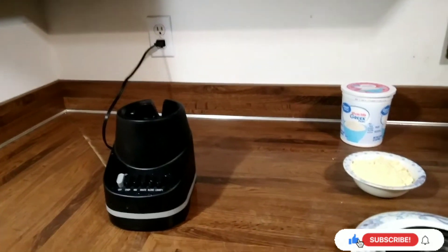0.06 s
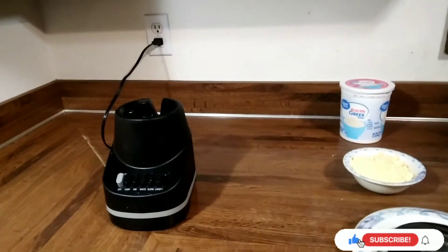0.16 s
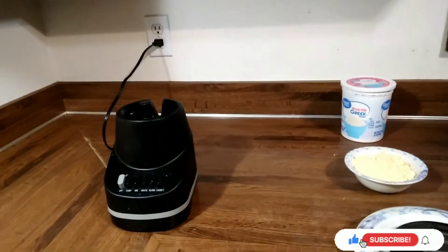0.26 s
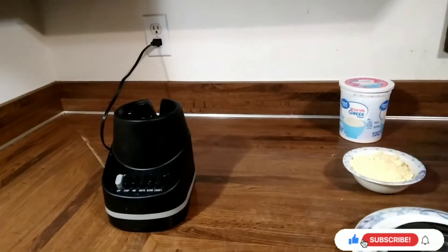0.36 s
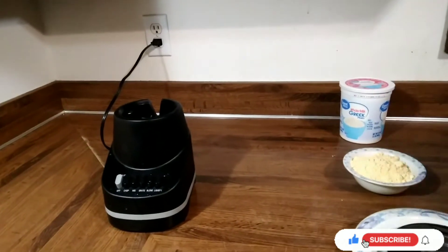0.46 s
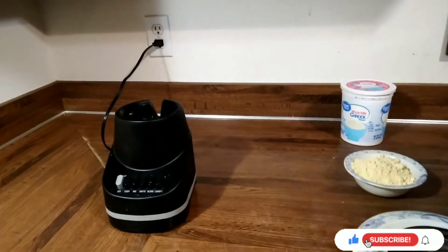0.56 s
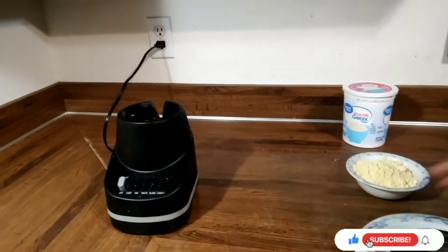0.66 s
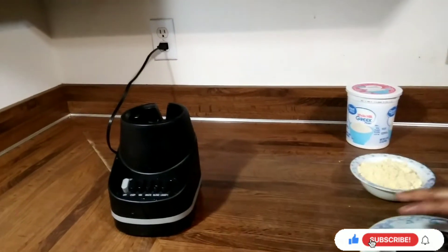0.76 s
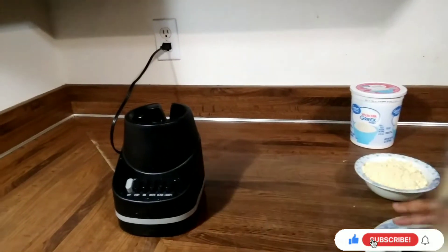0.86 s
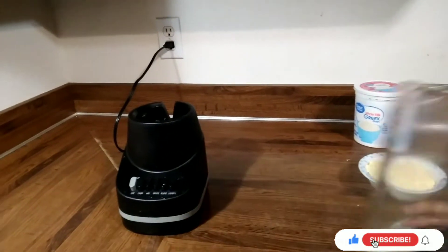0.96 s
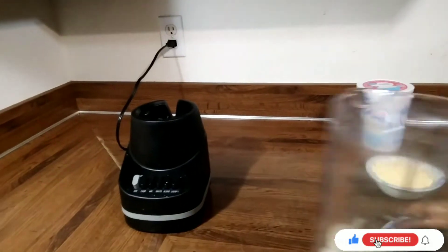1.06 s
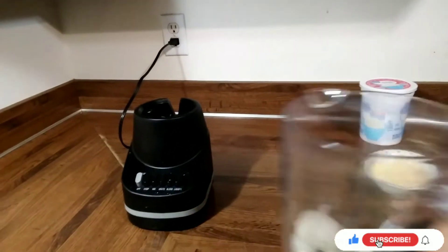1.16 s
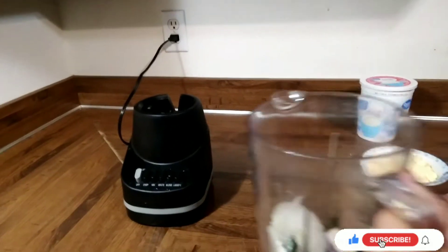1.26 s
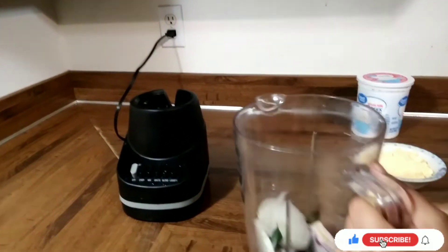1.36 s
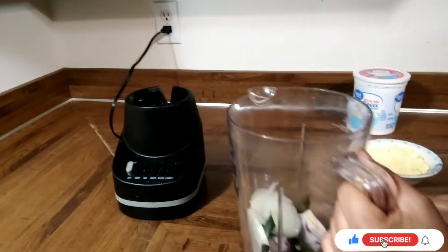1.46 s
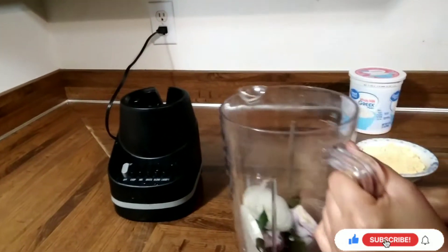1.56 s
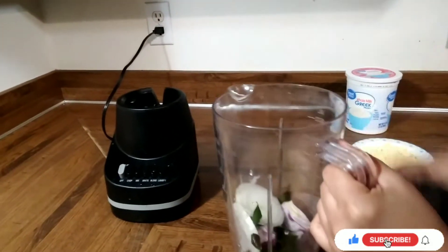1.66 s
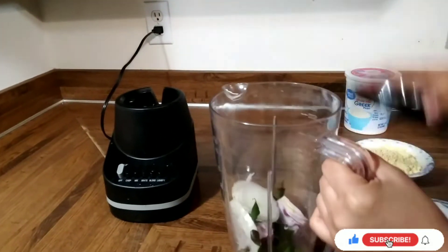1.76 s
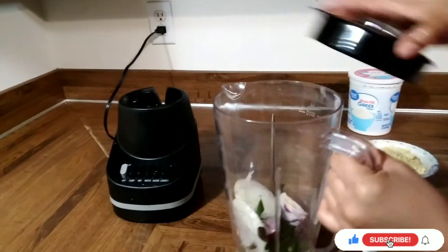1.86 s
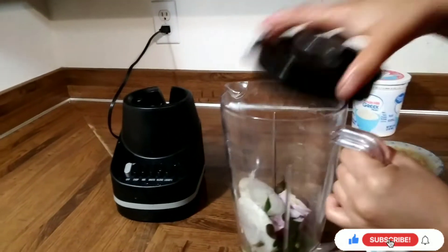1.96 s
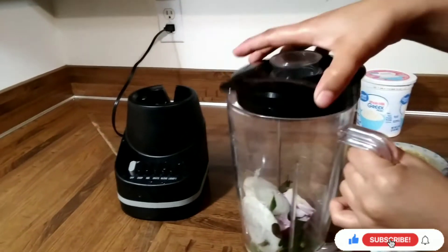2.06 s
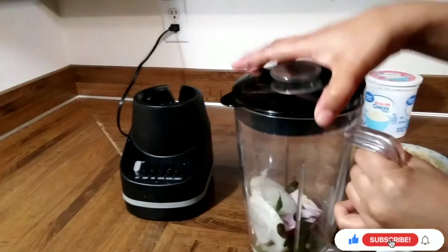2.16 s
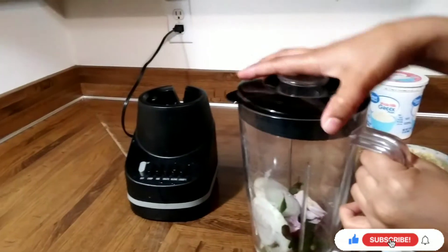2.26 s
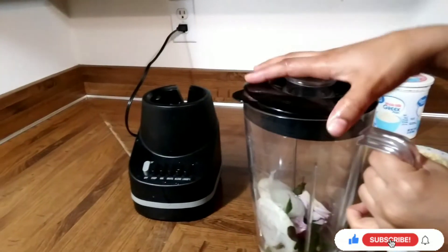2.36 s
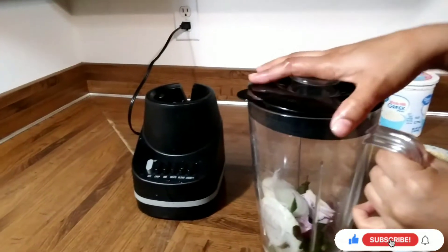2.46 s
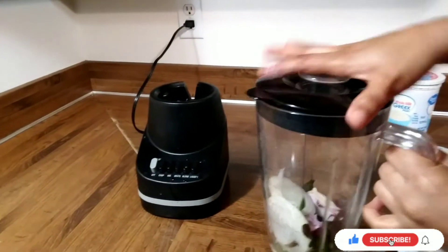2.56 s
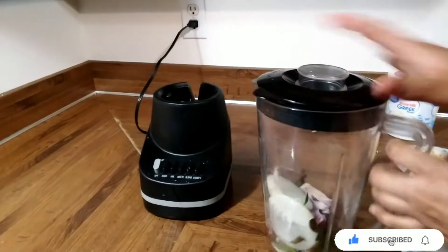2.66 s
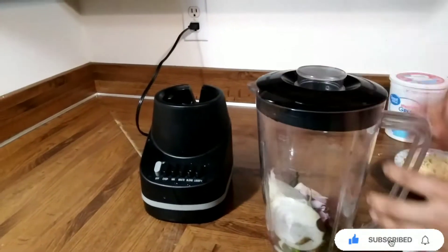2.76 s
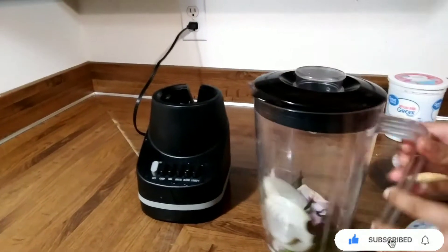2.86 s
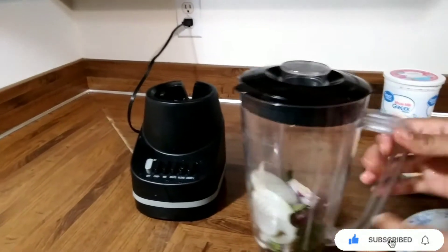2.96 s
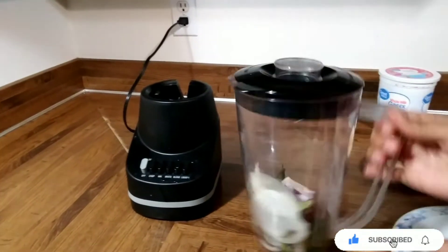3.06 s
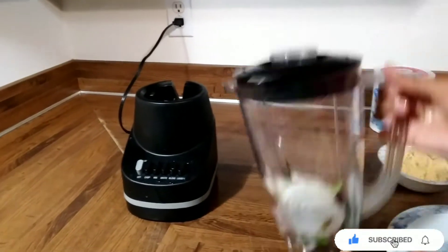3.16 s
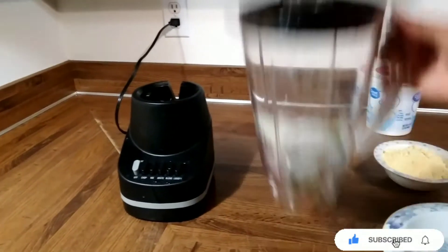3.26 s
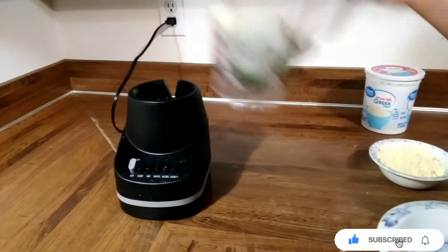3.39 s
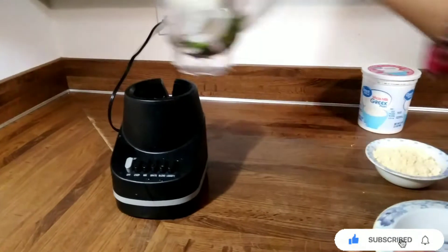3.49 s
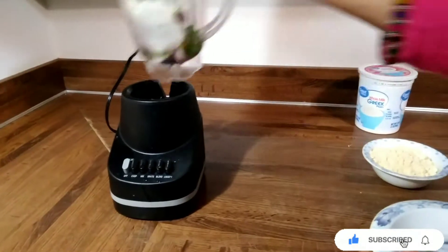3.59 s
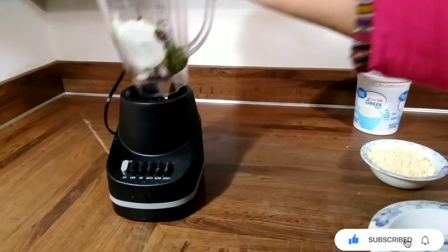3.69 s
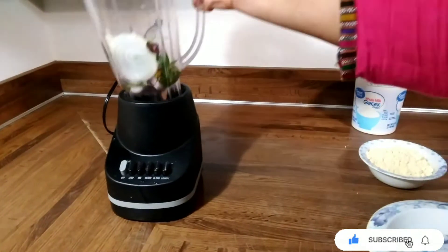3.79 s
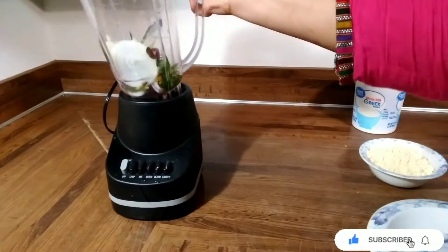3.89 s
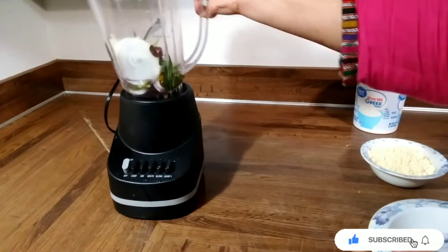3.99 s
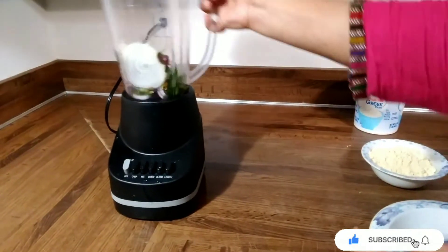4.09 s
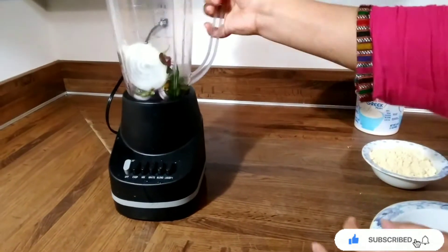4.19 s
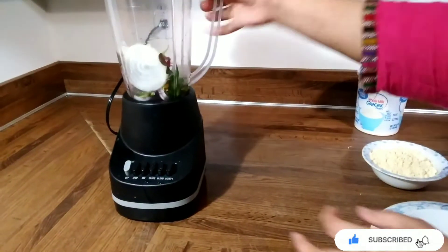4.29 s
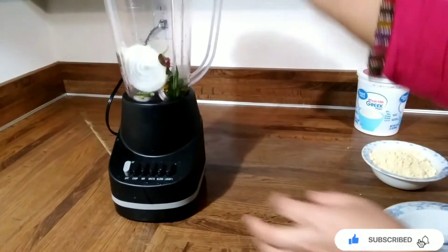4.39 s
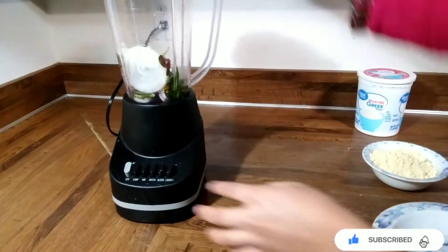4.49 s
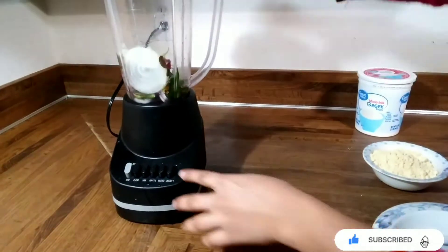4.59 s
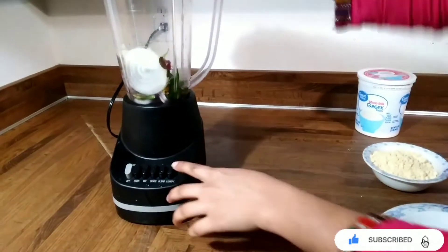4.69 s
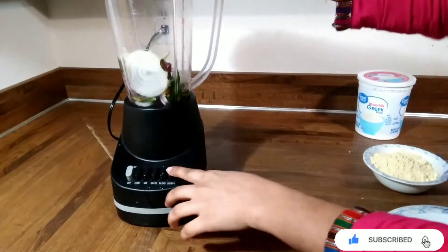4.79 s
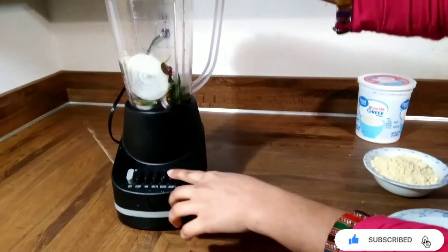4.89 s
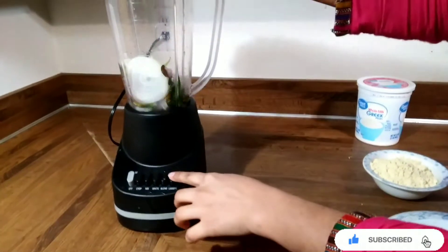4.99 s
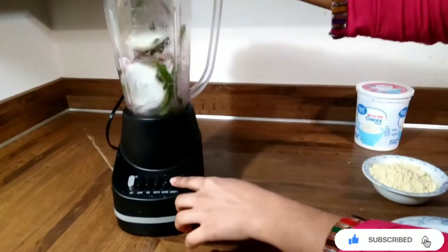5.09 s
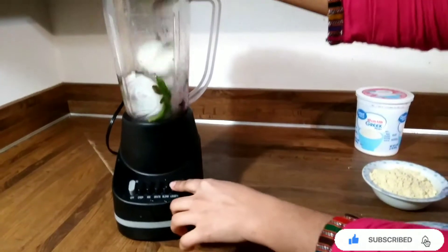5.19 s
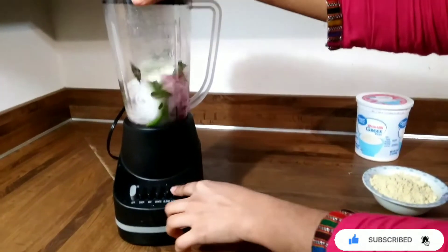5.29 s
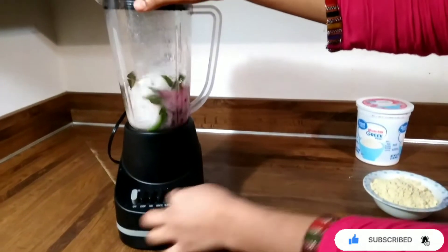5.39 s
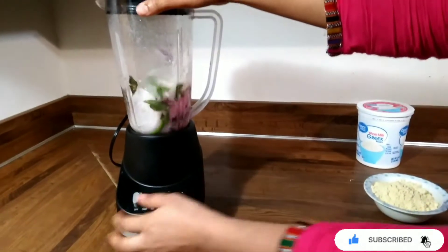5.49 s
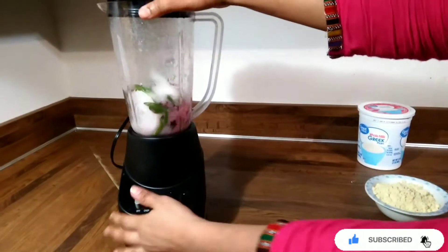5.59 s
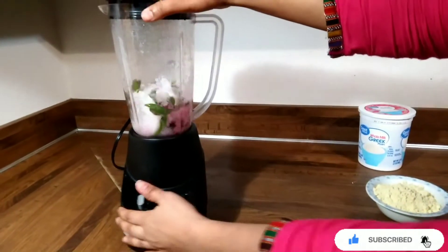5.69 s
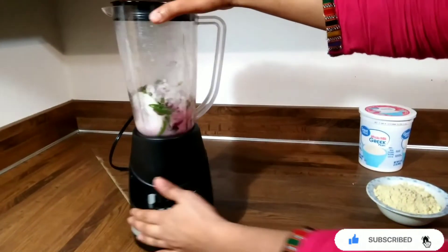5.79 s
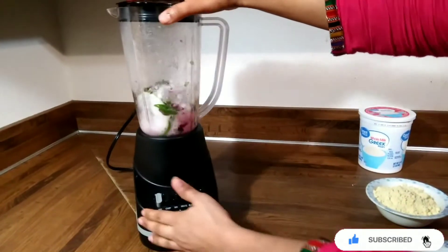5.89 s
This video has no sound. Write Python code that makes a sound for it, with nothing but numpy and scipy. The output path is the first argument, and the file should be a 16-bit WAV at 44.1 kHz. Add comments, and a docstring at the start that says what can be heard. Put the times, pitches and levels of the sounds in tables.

```python
"""A blender motor spins up, hums and whines while its blades chop vegetables and fling them at the jar wall.
Before a button starts it, the plastic jar is set on a wooden counter, lidded, lifted and seated on its
base: each blow rings the plastic, thumps the counter and cracks at the contact. Hands rub; trapped air pops.
A small kitchen, heard by two microphones, the left dull and the right bright."""
import sys
import numpy as np
from scipy import signal
from scipy.fft import rfft, irfft, next_fast_len
from scipy.io import wavfile
from scipy.ndimage import uniform_filter1d

SR = 44100
rng = np.random.default_rng(int(sys.argv[2]) if len(sys.argv) > 2 else 0)


def to_wav(s):
    """Save 16-bit WAV."""
    ch = np.atleast_2d(s).T  # columns
    pcm = np.round(np.clip(ch, -1, 1) * 32767)  # PCM
    wavfile.write(sys.argv[1], SR, pcm.astype(np.int16))


N = 261947
T = np.arange(N) / SR
KITCHEN_T60_S = .28


def from_db(db):
    return 10 ** (np.asarray(db) / 20)


def unit_rms(x):
    """Scale the channel mean to rms 1."""
    return x / np.sqrt(np.mean(np.atleast_2d(x).mean(0) ** 2) + 1e-20)


def at_hz(points, hz):
    """Interpolate on a log-frequency axis."""
    f, value = np.transpose(points)
    return np.interp(np.log(hz + 1), np.log(f), value)


def filtered(x, gain):
    """Apply gain(hz) by FFT."""
    size = next_fast_len(N + 8192)
    return irfft(rfft(x, size) * gain(np.arange(size // 2 + 1) * SR / size), size)[..., :N]


def white_pair():
    return rng.standard_normal((2, N))


def drift(rate_hz):
    """Slow random curve, rms 1."""
    knots = rng.standard_normal(2048)
    return unit_rms(np.interp(2 * rate_hz * T, np.arange(len(knots)), knots))


def bump(at_s, half_s):
    """Gaussian swell, height 1."""
    return np.exp(-np.minimum(((T - at_s) / half_s) ** 2, 20))


def clicks_at(times_s, sizes):
    out = np.zeros(N)
    out[np.round(np.asarray(times_s) * SR).astype(int)] = sizes
    return out


def ring(clicks, hz, t60_s):
    """Each click starts a damped sine."""
    r, w = from_db(-60 / (t60_s * SR)), 2 * np.pi * hz / SR
    return signal.lfilter([0, np.sin(w)], [1, -2 * r * np.cos(w), r * r], clicks + 1e-18)


def fade(energy, t60_s):
    """Each energy impulse decays exponentially."""
    return signal.lfilter([1], [1, -from_db(-120 / (t60_s * SR))], energy + 1e-18)


def stroke_power(table, release_db_per_s):
    """Summed power of strokes that swell, hold and decay."""
    power = 0
    for at_s, hold_s, db, rise_s in table:
        below_db = 20 * np.maximum(at_s - T, 0) / rise_s
        below_db += release_db_per_s * np.maximum(T - at_s - hold_s, 0)
        power = power + from_db(db - np.minimum(below_db, 100)) ** 2
    return power


# left-right likeness: f/Hz, correlation before clipping
STEREO_LIKENESS = [(60, 0.8), (300, 1.02), (570, 0.26), (900, 0.32), (1300, 0), (12000, 0)]


def coloured(pair, spectrum):
    """Shape two independent noises into a stereo field, alike in the bass; rms 1."""
    def gain(hz):
        alike = np.clip(at_hz(STEREO_LIKENESS, hz), -.99, .99)
        skirts = 1 / (1 + (hz / spectrum[-1][0]) ** 6) / (1 + (spectrum[0][0] / (hz + 1)) ** 4)
        return skirts * from_db(at_hz(spectrum, hz)) * np.sqrt([1 + alike, 1 - alike])
    mid, side = filtered(pair, gain)
    return unit_rms(np.array([mid + side, mid - side]))


# room rumble: f/Hz, level/dB
RUMBLE_SPECTRUM = [(20, 4), (45, -4.5), (70, -9), (110, -18.5), (160, -21.5), (320, -24.5), (600, -36),
                   (1200, -45), (2500, -58.5)]
# its swells: t/s, hold/s, level/dB, 20 dB rise/s
RUMBLE_SWELLS = [(0.5, .06, -49, .12), (1.1, .08, -48.5, .15)]


def rumble(room_db=-58, shudder_db=-17):
    """Low room noise with soft swells; the counter shudders on after each knock."""
    times_s, _, _, thump_db, _ = np.transpose(JAR_BLOWS + BASE_BLOWS)
    shudder = fade(clicks_at(times_s, from_db(thump_db + shudder_db) ** 2), t60_s=.8)
    power = from_db(room_db) ** 2 + stroke_power(RUMBLE_SWELLS, release_db_per_s=60) + shudder
    return uniform_filter1d(np.sqrt(power), size=SR // 100) * coloured(white_pair(), RUMBLE_SPECTRUM)


# friction noise: f/Hz, level/dB
RUB_SPECTRUM = [(290, -43), (500, -8.5), (534, -13.5), (766, -13), (1240, -22), (1610, -13.5),
                (1800, -17.5), (2220, -2), (2470, -2), (2680, -4.5), (3990, -7), (4390, -7.5), (6280, -21),
                (10300, -16), (12100, -26), (15700, -59.5), (22000, -120)]
# hand and jar strokes: t/s, hold/s, level/dB, 20 dB rise/s
RUB_STROKES = [(0.0, .035, -58, .05), (1.02, .05, -44, .15), (1.13, .08, -61, .05), (1.36, .2, -50.5, .015),
               (1.58, .015, -43, .04), (1.64, .28, -49, .05), (1.85, .025, -46, .1), (2.14, .12, -57.5, .1),
               (2.44, .06, -65, .01), (2.58, .075, -47, .15), (2.69, .04, -52, .05), (2.8, .03, -51, .06),
               (2.92, .035, -44, .09), (3.03, .03, -40.5, .04), (3.12, .025, -62, .05),
               (3.648, .008, -56, .008), (3.67, .03, -64.5, .05), (3.78, .055, -48, .02),
               (3.88, .06, -62, .05), (4.05, .125, -65, .04), (4.48, .055, -64, .25),
               (4.65, .135, -62, .05)]


def rubbing(hiss_db=-77):
    """Hand and jar slide: a grainy rustle with flickering resonances swells out of faint hiss."""
    grain = coloured(white_pair() * from_db(drift(150)), RUB_SPECTRUM)
    rustle = grain
    for hz in (2620, 2970, 3146, 3643):
        resonance = signal.lfilter(*signal.iirpeak(hz, Q=22, fs=SR), grain)
        rustle = rustle + from_db(-8 + 6.7 * drift(11)) * resonance
    power = stroke_power(RUB_STROKES, release_db_per_s=300) + from_db(hiss_db) ** 2
    return np.sqrt(power) * from_db(1.8 * drift(28)) * unit_rms(rustle)


def burst(times_s, level_db, spectrum, t60_s, tail_db, rise_t60_s):
    """Dense short-lived modes as noise: a crack, then the kitchen's tail."""
    energy = clicks_at(times_s, from_db(level_db) ** 2)
    power = fade(energy, t60_s) + from_db(tail_db) ** 2 * fade(energy, KITCHEN_T60_S)
    lag = from_db(-60 / (rise_t60_s * SR))
    envelope = signal.lfilter([1 - lag], [1, -lag], np.sqrt(power))
    return envelope * coloured(white_pair(), spectrum)


# plastic ticks: t/s, level/dB
PLASTIC_TICKS = [(0.215, -65), (3.573, -65), (3.944, -56)]


def plastic_ticks():
    """Plastic ticks faintly, near 3 kHz."""
    spectrum = [(2300, -11.5), (3000, 4.5), (3600, 0), (5500, -20.5)]
    return burst(*np.transpose(PLASTIC_TICKS), spectrum, t60_s=.1, tail_db=-9, rise_t60_s=.007)


def struck(times_s, level_db, modes, rise_t60_s, scatter_db=2.5):
    """Each blow rings each mode with scattered strength; soft contact slows the rise."""
    sizes = from_db(level_db + scatter_db * rng.standard_normal((len(times_s), len(modes))))
    out = 0
    for k, (hz, db, t60_s) in enumerate(modes):
        clicks = clicks_at(times_s, (-1) ** k * from_db(db) * sizes[:, k])
        out = out + ring(clicks, hz, t60_s) - ring(clicks, hz, rise_t60_s)
    return out


# wooden counter: f/Hz, level/dB, t60/s
COUNTER_RESONANCES = [(72.8, -2.5, 0.12), (97.3, 1.5, 0.1), (110.7, 0, .12), (138, -6.5, 0.086)]
# low and high parts of a contact crack: f/Hz, level/dB
CLACK_SPECTRUM = [(120, -19), (250, -1.5), (450, 3), (600, -1), (850, -1.5), (1300, -8.5), (1800, -10.5),
                  (2600, -20)]
TICK_SPECTRUM = [(1200, -25), (2000, -6), (2500, -1), (3600, -2), (5000, -10.5), (7000, -22.5),
                 (10500, -19.5), (12500, -39), (16000, -39.5)]


def blows(table, modes, ring_db, thump_db, clack_db, tick_db, focus_db_per_oct,
          rise_t60_s, crack_t60_s, tail_db, dulling=0, firm_db=-39):
    """A blow rings the object, thumps the counter and cracks; the gains add to the table's levels."""
    times_s, body_db, focus_hz, counter_db, crack_db = np.transpose(table)
    # the spot hit favours modes near one pitch
    octaves = np.abs(np.log2(np.array(modes)[:, 0] / focus_hz[:, None]))
    tones = struck(times_s, body_db[:, None] + ring_db - focus_db_per_oct * octaves, modes, rise_t60_s)
    thump = struck(times_s, counter_db[:, None] + thump_db, COUNTER_RESONANCES, rise_t60_s=.035)
    # a soft touch is duller
    treble_db = crack_db - dulling * np.maximum(firm_db - crack_db, 0)
    clack = burst(times_s, crack_db + clack_db, CLACK_SPECTRUM, crack_t60_s, tail_db, rise_t60_s)
    tick = burst(times_s, treble_db + tick_db, TICK_SPECTRUM, crack_t60_s, tail_db, rise_t60_s)
    return tones + thump + clack + tick


# jar on counter: t/s, ring/dB, focus/Hz, thump/dB, crack/dB
JAR_BLOWS = [(0.614, -50, 296, -66, -61), (0.871, -40, 334, -69, -60), (0.94, -32, 330, -49, -41),
             (1.001, -34, 358, -64, -47), (1.065, -40, 337, -69, -46), (1.156, -41, 426, -61, -64),
             (1.204, -44.5, 345, -67, -70), (1.347, -21.5, 366, -32, -41), (1.371, -23.5, 334, -37, -39),
             (1.498, -20.5, 480, -38, -31.5), (1.514, -22, 219, -45.5, -57), (1.574, -37, 343, -50, -48),
             (2.357, -41, 321, -44.5, -62), (2.557, -31, 226, -43.5, -45), (2.851, -28, 450, -50, -44),
             (2.952, -23.5, 214, -41, -45), (2.974, -22, 217, -37.5, -41)]
# jar: f/Hz, level/dB, t60/s
JAR_RESONANCES = [(213, -2, 0.11), (250, -18.5, 0.18), (279.4, -6.5, 0.067), (340.4, -4, 0.1),
                  (422, -7.5, 0.086), (471.8, -10.5, 0.18), (574, -11, 0.032), (723, -23, 0.14),
                  (920, -21, 0.056)]


def jar_knocks():
    """The filled jar bumps the counter and rings low."""
    return blows(JAR_BLOWS, JAR_RESONANCES, ring_db=1, thump_db=7.5, clack_db=4, tick_db=-4,
                 focus_db_per_oct=10.5, rise_t60_s=.012, crack_t60_s=.034, tail_db=-8.5)


# lid on rim: t/s, ring/dB, focus/Hz, thump/dB, crack/dB
LID_BLOWS = [(1.9469, -7, 2470, -49, -22), (2.1109, -52, 4500, -40, -29.5), (2.2367, -55, 3460, -45.5, -49)]
# lid: f/Hz, level/dB, t60/s
LID_RESONANCES = [(1000, -11.5, 0.033), (1156, -8.5, 0.037), (1555, -12, 0.044), (2276, -4, 0.034),
                  (2442, -9, .08), (2660, -7, 0.04), (3020, -17.5, .06), (3517, -14.5, 0.041)]


def lid_snaps():
    """The lid snaps onto the rim: hard contact, bright ring."""
    return blows(LID_BLOWS, LID_RESONANCES, ring_db=-4, thump_db=.5, clack_db=-6, tick_db=2.5,
                 focus_db_per_oct=-1.5, rise_t60_s=.00069, crack_t60_s=.088, tail_db=-23)


# air pops: t/s, level/dB, f/Hz, t60/s
LID_POPS = [(1.947, -16, 418, 0.068), (2.034, -21.5, 357.4, 0.08), (2.11, -24.5, 250, .08),
            (2.767, -33.5, 455, 0.036), (2.851, -17.5, 408, 0.023)]


def air_pops():
    """Air trapped under the lid pops, one damped tone each time."""
    return sum(struck([at_s], db, [(hz, 0, t60_s)], rise_t60_s=.0039, scatter_db=1.5)
               for at_s, db, hz, t60_s in LID_POPS)


# knocks on base: t/s, ring/dB, focus/Hz, thump/dB, crack/dB
BASE_BLOWS = [(3.761, -14.5, 374, -23, -36.5), (3.822, -24.5, 213, -21.5, -37.5),
              (3.902, -39.5, 215, -37, -47), (4.01, -34.5, 215, -25.5, -43), (4.033, -22, 326, -20, -37),
              (4.075, -19, 201, -19, -33), (4.171, -43, 245, -30.5, -47), (4.228, -28.5, 180, -29, -52),
              (4.242, -25, 181, -34, -53), (4.274, -32, 213.6, -34, -51), (4.592, -21.5, 193, -30, -48),
              (4.617, -29, 202, -34, -41.5), (4.65, -25, 204, -28, -40), (4.691, -30.5, 187, -37, -46),
              (4.902, -48, 237, -44, -48), (4.964, -23, 331, -29, -26.5), (4.984, -8, 207, -39, -23)]
# base: f/Hz, level/dB, t60/s
BASE_RESONANCES = [(204, -7, 0.074), (251, -9.5, 0.063), (325.4, -7.5, 0.081), (374, -6.5, 0.039),
                   (422.6, -7, .07), (759, -11, 0.089), (885, -16.5, 0.041), (1180, -16.5, 0.075)]


def base_knocks():
    """Jar, fingers and the starting motor knock the base."""
    return blows(BASE_BLOWS, BASE_RESONANCES, ring_db=4.5, thump_db=6, clack_db=.5, tick_db=-3,
                 focus_db_per_oct=10, rise_t60_s=.0081, crack_t60_s=.092, tail_db=-17, dulling=1.1)


def blade_shake(turns_per_s, angle, load_db, housing_hz=226, width_hz=38):
    """Unbalanced blades shake the housing, hardest at its resonance and under load."""
    response = 1 / np.hypot(1, 2 * (turns_per_s - housing_hz) / width_hz)
    return from_db(-14.2 + 1.5 * load_db + 1.2 * drift(25)) * response * np.sin(angle)


# shaft harmonics: order, level/dB re order 2
SHAFT_HARMONICS = [(3, -0.5), (4, -7), (5, -6.5), (9, -5.5), (12, -17)]


def shaft_whine(turns_per_s, angle, second_db=-28, fan_blades=10):
    """Shaft harmonics flutter; the fan's tone grows with speed."""
    fan_db = -19.5 + .5 * (turns_per_s - 270)
    orders = [(2, second_db), (fan_blades, fan_db)] + [(k, second_db + db) for k, db in SHAFT_HARMONICS]
    lag_rad = np.array([[0], [.13]])  # left, right
    return sum(from_db(db + 2 * drift(12)) * np.sin(k * (angle - lag_rad)) for k, db in orders)


def winding_hum(on_s, strain_db, hum_hz=118):
    """Mains hum of the windings surges while the motor accelerates."""
    surge_db = 16.5 * bump(on_s + .068, half_s=.04)
    return from_db(-28 + strain_db + surge_db) * np.sin(2 * np.pi * hum_hz * T + 1.02 * drift(7.4))


def food_impacts(angle, per_s, spread_db, t60_s, rush_db, pulse_depth):
    """Pieces hit blades and wall at random over a rush of air; both pulse once a turn."""
    sizes = from_db(spread_db * np.minimum(rng.exponential(1, N), 4))
    hits = fade((rng.random(N) < per_s / SR) * sizes ** 2, t60_s)
    power = hits / hits.mean() + from_db(rush_db) ** 2
    return np.sqrt(power) * (1 + pulse_depth * np.cos(angle)) * white_pair()


# loaded jar: f/Hz, width/Hz, relative level/dB
LOADED_JAR_PEAKS = [(334, 11.7, 6), (681, 22, 8), (774.5, 12, 3), (897, 24, -4), (1343, 15, 5.5),
                    (1587, 15, 5), (2350, 65, -10), (2630, 48, -2), (3320, 97, -15.5), (4260, 60, -5)]


def through_jar(x, flicker_db=4):
    """The jar's resonances swell and sink as food slaps the wall."""
    out = x
    for hz, width_hz, db in LOADED_JAR_PEAKS:
        r, w = np.exp(-np.pi * width_hz / SR), 2 * np.pi * hz / SR
        peak = signal.lfilter((1 - r * r) / 2 * np.array([1, 0, -1]), [1, -2 * r * np.cos(w), r * r], x)
        out = out + from_db(db - 2 + flicker_db * drift(8)) * peak
    return unit_rms(out)


def wall_echoes(x, t60_s, wet_db):
    """Quick reflections off jar, counter and corner ripple each channel's spectrum."""
    age_s = T[:SR // 20]
    echo = rng.standard_normal((2, len(age_s))) * from_db(-60 * age_s / t60_s)
    echo /= np.sqrt(np.sum(echo ** 2, axis=1, keepdims=True))
    return unit_rms(x + from_db(wet_db) * signal.fftconvolve(x, echo, axes=1)[:, :N])


# food churned and chopped: f/Hz, level/dB
CHURN_SPECTRUM = [(35, -16), (70, 0.5), (135, -1.5), (165, -10), (215, 4.5), (290, -4.5), (340, -2),
                  (500, -1), (570, -3), (680, -1.5), (1200, 1.5), (1800, -7.5), (2300, -22)]
CHOP_SPECTRUM = [(1000, -40), (1700, -9), (1860, -10), (2140, -2), (2460, -1.5), (2670, -5.5), (2870, -3),
                 (3250, -2), (4060, -7.5), (5820, -17), (7440, -18), (9280, -21), (10300, -17),
                 (11000, -22), (12100, -33.5), (15700, -49), (22000, -120)]


def grinding(angle, load_db):
    """Food in the jar: a low churn, and a bright chop that follows the load."""
    churn = food_impacts(angle, per_s=83, spread_db=3, t60_s=.012, rush_db=8, pulse_depth=.095)
    chop = food_impacts(angle, per_s=200, spread_db=3.5, t60_s=.015, rush_db=6, pulse_depth=.1)
    chop = wall_echoes(through_jar(coloured(chop, CHOP_SPECTRUM)), t60_s=.058, wet_db=-6.5)
    churn = through_jar(coloured(churn, CHURN_SPECTRUM))
    return from_db(-17.3) * churn + from_db(-13.3 + load_db) * chop


# blades bite a big piece or run free: t/s, half-length/s, speed loss/(turns/s), load/dB, hum/dB
BLADE_BITES = [(5.145, .055, 4, 2.5, -3), (5.375, .045, 8, 1.2, 8), (5.475, .05, 0, -3, 2),
               (5.612, .022, 4, .5, 0), (5.81, .04, 2, -.5, 1), (5.903, .022, 0, 2, 7)]


def blender(on_s=4.964, spin_up_s=.081, base_turns_per_s=238, gain_turns_per_s2=41.5):
    """The shaft races up, then keeps gaining as the food gets finer; bites slow it."""
    age_s = np.maximum(T - on_s, 0)
    spin = 1 - np.exp(-age_s / spin_up_s)
    sag, load_db, strain_db = sum(np.outer(effects, bump(at_s, half_s))
                                  for at_s, half_s, *effects in BLADE_BITES)
    turns_per_s = spin * (base_turns_per_s + gain_turns_per_s2 * age_s) - sag
    food_jolts = 1 + .0008 * drift(25)
    angle = 2 * np.pi * np.cumsum(turns_per_s * food_jolts) / SR
    shake = spin * blade_shake(turns_per_s, angle, load_db)
    motor = shake + shaft_whine(turns_per_s, angle) + winding_hum(on_s, strain_db)
    effort = .2 + .8 * spin ** 2.6
    return (T > on_s) * (np.sqrt(2) * spin * motor + effort * grinding(angle, load_db))


def kitchen(x, wet_db, first_echo_s=.004):
    """Add diffuse room reflections, thin in the bass."""
    noise = coloured(white_pair(), [(40, -9), (200, -6), (450, -2), (16000, -8.5)])
    echo = noise * from_db(-60 * T / KITCHEN_T60_S) * (T > first_echo_s)
    echo = echo[:, :SR // 2] / np.sqrt(np.sum(echo[0] ** 2))
    return x + from_db(wet_db) * signal.fftconvolve(x.mean(0)[None], echo, axes=1)[:, :N]


def scene():
    """Handling noises over room rumble, then the blender."""
    handling = jar_knocks() + lid_snaps() + base_knocks() + air_pops() + plastic_ticks()
    return kitchen(handling, wet_db=-7) + rubbing() + rumble() + blender()


def treble_gate(x, threshold_db, depth_db, split_hz):
    """A noise suppressor turns faint treble down."""
    treble = filtered(x, lambda hz: hz ** 6 / (hz ** 6 + split_hz ** 6))
    power = np.abs(uniform_filter1d(np.mean(treble ** 2, axis=0), size=SR // 60))
    closed = 1 / (1 + (power / from_db(threshold_db) ** 2) ** 3)
    return x - (1 - from_db(-depth_db * closed)) * treble


# microphone balance: f/Hz, left minus right/dB
MIC_BALANCE = [(60, -3.5), (250, 0.1), (900, -1.5), (2000, 2.5), (3000, 7.5), (4200, 7), (5700, -1),
               (8000, -20), (10500, -27), (12000, -16), (14500, -1)]


def record(dry):
    """Microphone colour, treble gate, soft clip, 15.8 kHz low-pass."""
    def microphones(hz):
        pair = from_db(at_hz(MIC_BALANCE, hz) * np.array([[.5], [-.5]]))
        return pair / np.sqrt(np.mean(pair ** 2, axis=0))
    heard = treble_gate(filtered(dry, microphones), threshold_db=-65.5, depth_db=14, split_hz=1200)
    rounded = heard / (1 + heard ** 8) ** (1 / 8)
    return signal.sosfilt(signal.ellip(10, .2, 70, 15800, fs=SR, output="sos"), rounded)


dry = scene()
out = record(dry)
to_wav(out)
```